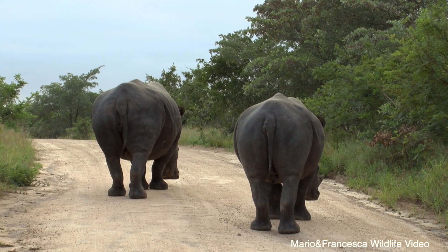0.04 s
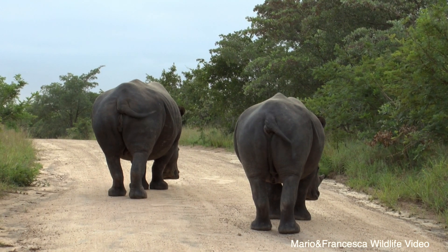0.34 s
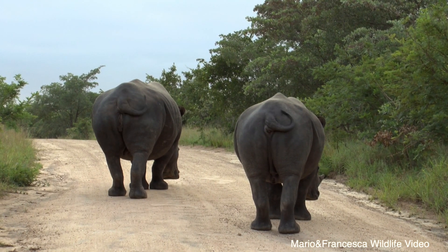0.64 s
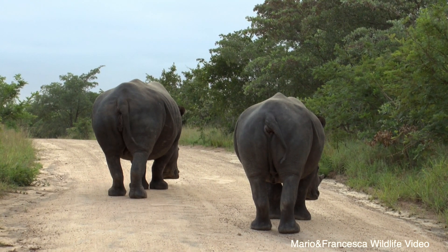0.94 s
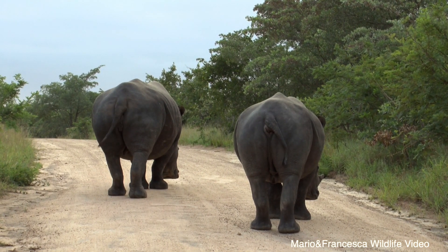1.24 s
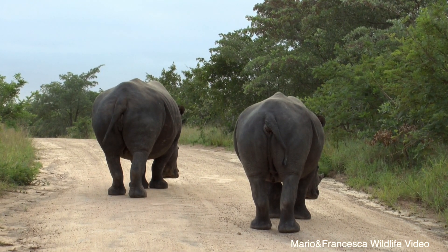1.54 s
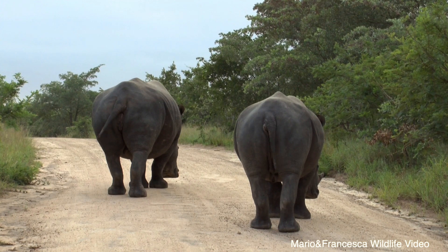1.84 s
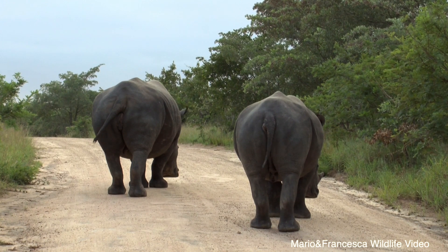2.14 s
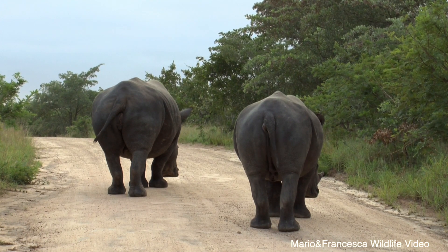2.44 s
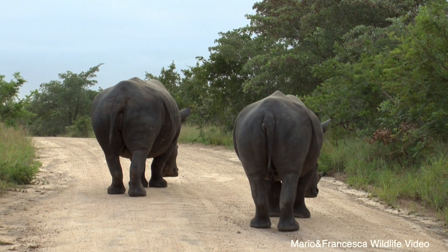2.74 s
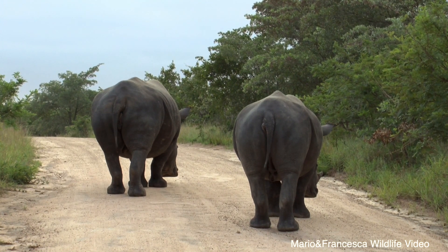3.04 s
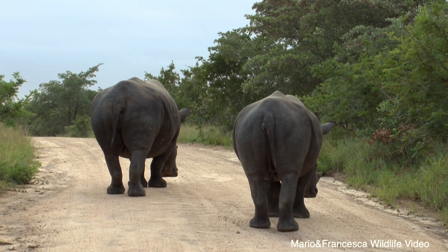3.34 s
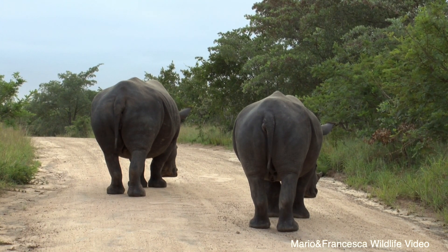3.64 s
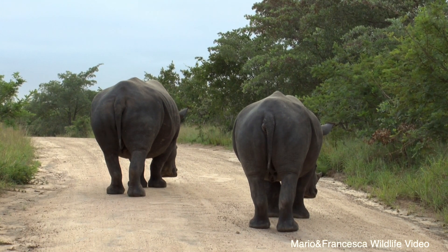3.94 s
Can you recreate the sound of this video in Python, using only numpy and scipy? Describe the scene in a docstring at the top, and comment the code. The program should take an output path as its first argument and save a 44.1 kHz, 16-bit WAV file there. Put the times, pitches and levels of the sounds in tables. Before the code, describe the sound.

A rhino whines and squeals outdoors, then birds chirp over a faint insect buzz.

```python
"""A rhino's long thin whine comes first, in front of the microphone on a dirt road in the bush. It sags,
climbs into a strained squeal, breaks off and ends in a short second squeal: harmonics sliding through
the resonances of throat and snout. Birds whistle, chirp and trill in the thicket on both sides, and
an insect pulses high above a soft background wash of outdoor air, faded down after the call."""
import sys
import numpy as np
from scipy import signal
from scipy.fft import rfft, irfft
from scipy.io import wavfile
from scipy.ndimage import uniform_filter1d

SR = 44100
rng = np.random.default_rng(int(sys.argv[2]) if len(sys.argv) > 2 else 0)


def persist_wave(psi):
    """Save psi, clipped to +-1, as 16-bit WAV."""
    counts = np.round(np.clip(psi, -1, 1) * 32767).astype(np.int16)
    wavfile.write(sys.argv[1], SR, np.atleast_2d(counts).T)


N = 176400
TIME = np.arange(N) / SR

# echo decay in the thicket (frequency [Hz], time to fall 60 dB [s])
THICKET_DECAY = [(500, 0.12), (3000, 0.3), (8000, 0.3)]
# colour of the outdoor air (frequency [Hz], relative level [dB])
AIR_SPECTRUM = [(25, -13), (50, -3), (75, -7), (120, -3), (250, -1), (450, -3), (1000, -9), (2000, -14),
                (4000, -17), (8000, -19), (12000, -26), (15500, -27)]
# recorded level of the background wash, faded down after the call (time [s], level [dB])
BACKGROUND_LEVEL = [(0, -41.5), (1.25, -41), (1.45, -49), (2.05, -58.5), (2.6, -53.5), (3.3, -58), (4, -51)]
# likeness of the air left and right of the microphone (frequency [Hz], coherence [0-1])
AIR_COHERENCE = [(30, 0.38), (300, 0.013), (1500, 0.26), (15000, 0.059)]
# bouts of insect buzz (middle time [s], relative level [dB])
INSECT_BOUTS = [(0, 5), (.27, 8.5), (.6, 2.5), (1.51, -8), (2.45, -9.5), (2.79, -10), (3.14, -7),
                (3.81, -10.5)]
# a distant bird's churrs (middle time [s], length [s], level [dB])
FAR_CHURRS = [(0.04, .11, -46.5), (2.238, 0.25, -60.5)]
# a whistler on the left sings its phrase and starts it again
# (time [s], length [s], start pitch [Hz], middle pitch [Hz], end pitch [Hz], level [dB])
WHISTLER_NOTES = [(0.078, 0.03, 3534, 3650, 3600, -39.5), (0.121, 0.036, 3634, 3667, 3616, -31),
                  (0.239, 0.083, 3643, 3422, 3440, -36.5), (0.294, 0.067, 3495, 3455, 3504, -33),
                  (0.441, 0.11, 3355, 3327, 3460, -39), (0.686, 0.036, 2730, 2907, 2990, -33.5),
                  (0.734, 0.059, 3040, 3240, 3230, -31.5), (1.003, 0.03, 2790, 2837, 3070, -38),
                  (1.053, 0.05, 3070, 3200, 3250, -36), (3.539, 0.063, 3680, 3737, 3850, -39.5),
                  (3.685, 0.0408, 3760, 3537, 3430, -39.5), (3.718, .032, 3354, 3456, 3370, -36),
                  (3.76, 0.03, 3410, 3488, 3420, -39.5), (3.796, 0.11, 3480, 3402, 3630, -47.5),
                  (3.895, 0.051, 3526, 3358, 3490, -39.5), (3.953, 0.021, 3500, 3500, 3550, -37)]
# birds at the thicket's edge (time [s], length [s], start pitch [Hz], middle pitch [Hz],
# end pitch [Hz], level [dB], left over right [dB], hoarseness [0-1])
NEAR_CHIRPS = [(1.237, .045, 1840, 1692, 1320, -45.5, -2, 0),
               (1.512, 0.046, 1510, 1817, 1730, -48.5, -18, 0.4),
               (1.55, .017, 1910, 2383, 2000, -35, -25, 0), (1.73, 0.045, 2453, 2540, 2830, -53, 27, 0.6),
               (2.265, .08, 3230, 3260, 3270, -58, 0, 0.94), (2.486, 0.04, 2040, 2870, 2900, -47, 23, 0.4),
               (2.533, 0.065, 3020, 2700, 2616, -41, 27, 0.08),
               (2.551, 0.076, 3270, 3305, 3290, -46, 31, 0.36),
               (2.764, 0.029, 3210, 2415, 1790, -52.5, 22, 0.65),
               (2.87, 0.046, 3180, 2033, 3300, -50, 19, 0.13),
               (2.951, 0.049, 3040, 2544, 2740, -51.5, 23, 0.65),
               (3.098, 0.021, 3570, 3570, 3520, -53, 24, 0.3),
               (3.754, 0.068, 3930, 4230, 5580, -49.5, 25, 0.6),
               (3.928, 0.054, 4880, 4550, 5400, -46.5, 21, .4)]
# a small bird repeats one falling pip (time [s], level [dB])
NEAR_PIPS = [(.3, -55), (.645, -51.5), (1.782, -67), (2.531, -60), (2.911, -59.5), (3.226, -63.5),
             (3.556, -60)]
# pitch of the rhino's call (time [s], pitch [Hz])
CALL_PITCH = [(0, 658.6), (.18, 604.6), (.39, 562.4), (.52, 565.3), (.7, 661.8), (.85, 744.5), (.92, 806.4),
              (.955, 812), (1.0, 775), (1.13, 779), (1.2, 758.4), (1.24, 729)]
# effort behind the whine (time [s], level [dB])
WHINE_EFFORT = [(0, -26.5), (.06, -22), (.13, -26.5), (.23, -22.5), (.32, -28), (.39, -24), (.52, -23),
                (.56, -26.5), (.6, -24), (.645, -26), (.7, -20.5), (.82, -30.5), (.895, -17), (.985, -22.5),
                (1.015, -46), (1.06, -51), (1.085, -73)]
# high overtones that strain brings out (time [s], level [dB])
CALL_STRAIN = [(.2, -58.5), (.62, -71), (.72, -48.5), (.8, -40), (.83, -38.5), (.875, -32.5), (.92, -31),
               (.945, -29), (.98, -39), (1.0, -41.5), (1.03, -66), (1.125, -77), (1.142, -42), (1.18, -33),
               (1.2, -38), (1.235, -43), (1.262, -75)]
# low resonances of throat and snout (frequency [Hz], gain [dB])
THROAT_RESONANCES = [(560, -0.5), (810, -1.5), (1120, -25), (1300, -30.5), (1345, -10.5), (1400, 1.5),
                     (1470, 2), (1540, -4), (1610, -2), (1685, -16.5), (1790, -7), (1860, -31), (2200, -37)]
# high resonances in the long whine (frequency [Hz], gain [dB])
WHINE_RESONANCES = [(2250, -18), (2420, -12.5), (3200, -27), (3600, -1.5), (4060, -1), (4320, -3),
                    (4450, -18), (4680, -6), (5050, -19), (5270, -2), (5620, -7.5), (6480, -11.5),
                    (6800, -25), (8450, -27), (8800, -15), (9100, -33), (10400, -25), (11500, -44)]
# high resonances in the closing squeal (frequency [Hz], gain [dB])
SQUEAL_RESONANCES = [(2300, -27), (3050, -22), (3700, 2.5), (3880, -1), (4550, -24), (5080, 0),
                     (5370, -5.5), (6100, -4), (6900, -21), (7700, -37), (9100, -30), (9950, -22.5),
                     (10800, -44)]
# air forced through the throat (middle time [s], length [s], centre [Hz], width [Hz], level [dB])
BREATH_SPURTS = [(0.848, 0.11, 7900, 2600, -42), (0.865, .1, 10700, 1400, -50.5),
                 (0.942, 0.043, 7660, 2240, -38), (1.2, .07, 9200, 2200, -58)]


def amp(db):
    """Decibels to gain."""
    return 10 ** (np.asarray(db) / 20)


def unit_rms(x):
    """Scales to rms 1."""
    return x / np.sqrt(np.mean(x ** 2) + 1e-20)


def curve(points):
    """A control curve, sample by sample."""
    return np.interp(TIME, *np.transpose(points))


def at_hz(points, hz):
    """Reads a spectrum on a log-frequency axis."""
    table_hz, value = np.transpose(points)
    return np.interp(np.log(hz + 1), np.log(table_hz + 1), value)


def hump(middle_s, length_s, power=2):
    """A smooth rise and fall; a higher power flattens the top."""
    return np.exp(-(2 * (TIME - middle_s) / length_s) ** power)


def pan(left_db):
    """Stereo gains; positive is left of the microphone."""
    gains = amp([[left_db / 2], [-left_db / 2]])
    return gains / np.sqrt(np.mean(gains ** 2))


def add(mix, start_s, sound):
    """Mixes a stereo sound in at a time."""
    part = mix[:, max(round(start_s * SR), 0):][:, :sound.shape[1]]
    part += sound[:, :part.shape[1]]


def noise(gain):
    """Noise of rms 1 with the given gain over frequency."""
    return unit_rms(irfft(rfft(rng.standard_normal(N)) * gain(np.fft.rfftfreq(N, 1 / SR)), N))


def wander(hz):
    """Random drift up to a rate."""
    return noise(lambda f: 1 / (1 + (f / hz) ** 4))


def band(centre_hz, width_hz, power=4):
    """Noise in one band; a higher power steepens its sides."""
    return noise(lambda f: 1 / (1 + (2 * (f - centre_hz) / width_hz) ** power))


def thicket(sound):
    """Sparse echoes from leaves and trunks, different on each side of the microphone."""
    slots = np.arange(100, SR // 2, 20)
    taps = np.zeros((2, SR))
    arrivals = slots + rng.integers(0, 20, (2, len(slots)))
    np.put_along_axis(taps, arrivals, rng.choice([-1., 1.], arrivals.shape), 1)
    hz, t, spectra = signal.stft(taps, SR, nperseg=256)
    decay = amp(-60 * t / at_hz(THICKET_DECAY, hz)[:, None])
    tail = signal.istft(spectra * decay, SR, nperseg=256)[1]
    return signal.fftconvolve(sound, tail / np.linalg.norm(tail[0]), axes=1)[:, :N]


def air(patch_db=1.5):
    """All around, a soft wash of air and distant leaves with faint drifting patches."""
    frames, hz = N // 256 + 5, np.fft.rfftfreq(1024, 1 / SR)
    a, b, c, d, patches = rng.standard_normal((frames, len(hz), 5)).T
    patches = uniform_filter1d(patches, size=12, axis=0)
    patches = unit_rms(uniform_filter1d(patches, size=16, axis=1))
    coherence = at_hz(AIR_COHERENCE, hz)[:, None]
    left = a + 1j * b
    right = coherence * left + np.sqrt(1 - coherence ** 2) * (c + 1j * d)
    colour = amp(at_hz(AIR_SPECTRUM, hz)[:, None] + patch_db * patches)
    wash = signal.istft(np.array([left, right]) * colour, nperseg=1024, noverlap=768)[1][:, :N]
    return pan(3) * amp(curve(BACKGROUND_LEVEL)) * unit_rms(wash)


def insect(pulses_per_s=25, floor_db=-13.5):
    """A narrow high buzz on both sides, pulsing in short bouts."""
    rate = pulses_per_s * (1 + 0.182 * wander(8.9))
    pulses = 1 + 0.64 * np.sin(2 * np.pi * np.cumsum(rate) / SR)
    bouts = amp(floor_db) + sum(amp(db) * hump(s, length_s=0.12) for s, db in INSECT_BOUTS)
    buzz = np.array([band(centre_hz=7020, width_hz=190, power=2) for side in range(2)])
    return amp(-61.5) * unit_rms(buzz * pulses * bouts)


def bird_note(length_s, start_hz, middle_hz, end_hz, hoarse=0, edge=0.29):
    """A wavering note bent through three pitches; hoarseness scatters its level and phase."""
    progress = np.linspace(0, 1, round(length_s * SR))

    def drift(per_s):
        return np.interp(progress * length_s, np.arange(64) / per_s, rng.standard_normal(64))

    bend = np.polyval(np.polyfit([0, .5, 1], [start_hz, middle_hz, end_hz], 2), progress)
    phase = 2 * np.pi * np.cumsum(bend * (1 + 0.0064 * drift(200))) / SR
    flicker = amp(3.95 * drift(200))
    soft_ends = np.sin(np.pi / 2 * np.minimum(np.minimum(progress, 1 - progress) / edge, 1))
    pure = np.sqrt(2 * (1 - hoarse ** 2)) * np.sin(phase)
    rough = hoarse * (drift(320) * np.sin(phase) + drift(320) * np.cos(phase))
    return soft_ends * flicker * (pure + rough)


def twitters(per_s=9, low_hz=2217, high_hz=5210, length_s=.045):
    """Far birds add faint, hoarse slurs at random, blurred by the thicket."""
    out = np.zeros((2, N))
    for when, height, side, tilt in rng.random((round(per_s * N / SR), 4)):
        hz = low_hz * (high_hz / low_hz) ** height
        sweep = 0.093 * np.cos(np.pi * tilt)
        slur = bird_note(length_s, hz * (1 + sweep), hz, hz * (1 - sweep), hoarse=0.57)
        add(out, when * N / SR, pan(20 * (side - .5)) * amp(-61) * slur)
    return (out + thicket(out)) / np.sqrt(2)


def churr(beats_per_s=58):
    """Far off to the right, a bird's hoarse call beats quickly as it swells and fades."""
    beat = (1 + 0.29 * np.cos(2 * np.pi * beats_per_s * TIME)) ** 2
    swell = sum(amp(db) * hump(s, length, power=4) for s, length, db in FAR_CHURRS)
    return pan(-11.5) * swell * unit_rms(beat * band(centre_hz=4576, width_hz=450))


def trill(start_s=2.126, length_s=.32, notes_per_s=66.7, note_s=.013):
    """Hard right, a bird's fast, uneven run of tiny notes; the pitch arches and the ends are soft."""
    base_hz, arch_hz, sweep = 2270, 109, 0.15
    fade_s, slip_s, echo_db = 0.022, .0005, -6.5
    out = np.zeros((2, N))
    for s in np.arange(0, length_s, 1 / notes_per_s):
        detune, late = rng.standard_normal(2)
        hz = (base_hz + arch_hz * np.sin(np.pi * s / length_s)) * (1 + 0.018 * detune)
        tick = bird_note(note_s, hz * (1 - sweep), hz, hz * (1 + sweep / 2), hoarse=0.31)
        fade = min(min(s + note_s / 2, length_s - s) / fade_s, 1)
        add(out, start_s + s + slip_s * late, pan(-32) * amp(-42) * fade * np.hanning(len(tick)) * tick)
    return out + amp(echo_db) * thicket(out)


def birds(deep_echo_db=-4.5, near_echo_db=-9.5, cross_echo_db=-29.5):
    """The whistler sings deep in the thicket on the left; chirps and pips come from its edge, drier."""
    pip_s, pip_hz = 0.03, (6400, 5710, 5700)
    deep, near = np.zeros((2, 2, N))
    for s, length, *bend, db in WHISTLER_NOTES:
        add(deep, s, pan(36.5) * amp(db) * bird_note(length, *bend))
    for s, length, *bend, db, left_db, hoarse in NEAR_CHIRPS:
        add(near, s, pan(left_db) * amp(db) * bird_note(length, *bend, hoarse, edge=0.19))
    for s, db in NEAR_PIPS:
        add(near, s, pan(2.5) * amp(db) * bird_note(pip_s, *pip_hz, hoarse=0.57, edge=0.19))
    direct = deep + near
    scattered = amp(deep_echo_db) * deep + amp(near_echo_db) * near + amp(cross_echo_db) * direct[::-1]
    return direct + thicket(scattered)


def rhino_breath(phase):
    """Air sputters through the strained throat, pulsing with each cycle of the voice."""
    hiss = sum(amp(db) * hump(s, length) * band(hz, width) for s, length, hz, width, db in BREATH_SPURTS)
    sputter = amp(1.5 * wander(140))
    return hiss * unit_rms(sputter * (1 + 0.78 * np.cos(phase)))


def rhino_voice(hz, phase):
    """Clean harmonics slide through fixed resonances; strain adds fluttering, raspy overtones."""
    squeal_s, rise_s, hold_s = 1.127, 0.017, 0.044
    fall_db_per_s2, dulling_db_per_s = 4997, 370
    bright_hz, top_hz, crossfade_hz, full_strain_db = 2020, 4840, 600, -33.5
    in_whine = TIME < squeal_s
    fading_s = np.maximum(TIME - squeal_s - hold_s, 0)
    attack = np.clip((TIME - squeal_s) / rise_s, 0, 1) ** 2
    squeal = attack * amp(-18.5 - fall_db_per_s2 * fading_s ** 2)
    shimmer = amp(0.8 * wander(47))
    effort = (amp(curve(WHINE_EFFORT)) * in_whine + squeal) * shimmer
    strain_db = curve(CALL_STRAIN)
    calling = TIME < CALL_STRAIN[-1][0]
    voice = np.zeros(N)
    for k in range(1, 16):
        high = np.clip((k * hz - bright_hz) / crossfade_hz + .5, 0, 1)
        top = np.clip((k * hz - top_hz) / crossfade_hz + .5, 0, 1)
        # the low overtones die before the fundamental
        clean = effort * amp(at_hz(THROAT_RESONANCES, k * hz) - dulling_db_per_s * fading_s * (k > 1))
        colour_db = np.where(in_whine, at_hz(WHINE_RESONANCES, k * hz), at_hz(SQUEAL_RESONANCES, k * hz))
        # the highest overtones need more strain and fade first
        weak_db = top * .6 * np.minimum(strain_db - full_strain_db, 0)
        flutter_db = 4 * np.minimum(wander(46), 1)
        rasp = 1 + 0.3 * wander(185)
        strained = amp(strain_db + colour_db + weak_db + flutter_db) * rasp * calling
        slip = high * 0.027 * k * wander(160) + rng.uniform(0, 2 * np.pi)
        voice += ((1 - high) * clean + high * strained) * np.sqrt(2) * np.cos(k * phase + slip)
    return voice


def rhino(jitter=0.004, echo_db=-14):
    """On the road, just left of centre: voice and breath share one pitch, and the thicket answers."""
    hz = curve(CALL_PITCH) * (1 + jitter * wander(105))
    phase = 2 * np.pi * np.cumsum(hz) / SR
    direct = pan(1.9) * (rhino_voice(hz, phase) + rhino_breath(phase))
    return direct + amp(echo_db) * thicket(direct)


def scene():
    """The rhino in front of the microphone, the bush all around."""
    return air() + insect() + rhino() + birds() + trill() + churr() + twitters()


def record(dry):
    """The recorder's band limit."""
    edge_hz = 15720
    lowpass = signal.firwin(511, edge_hz, window=("kaiser", 9), fs=SR)
    return signal.oaconvolve(dry, lowpass[None], "same")


dry = scene()
out = record(dry)
persist_wave(out)
```